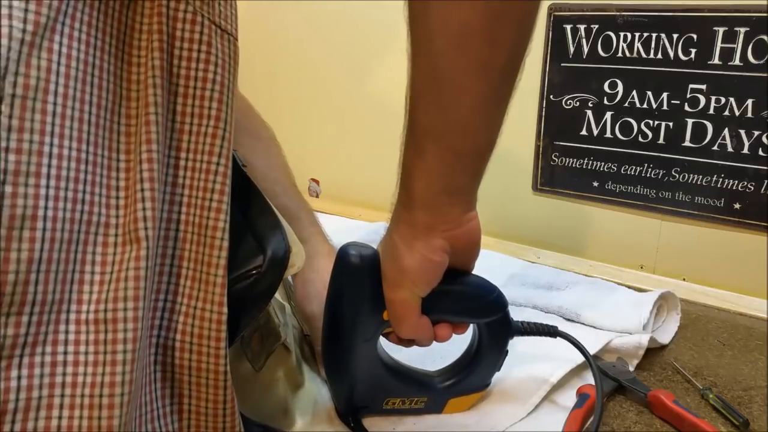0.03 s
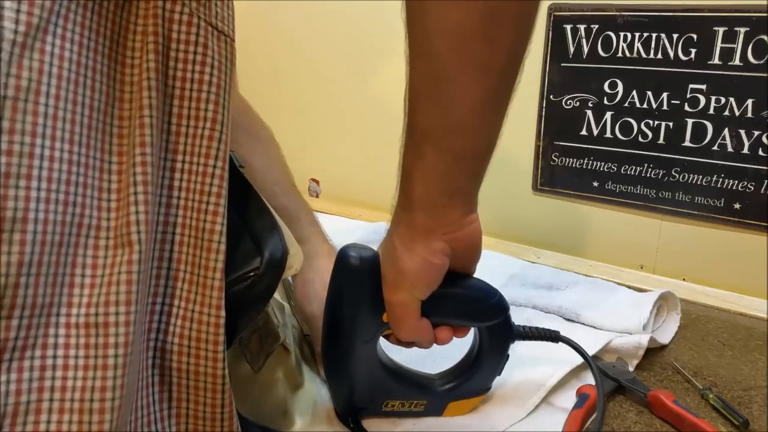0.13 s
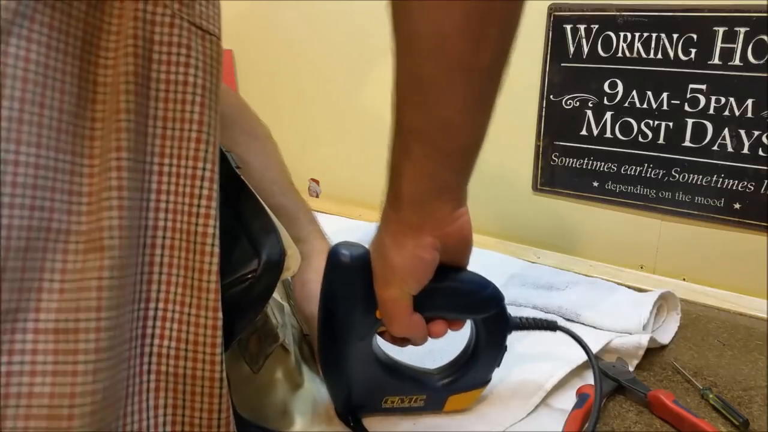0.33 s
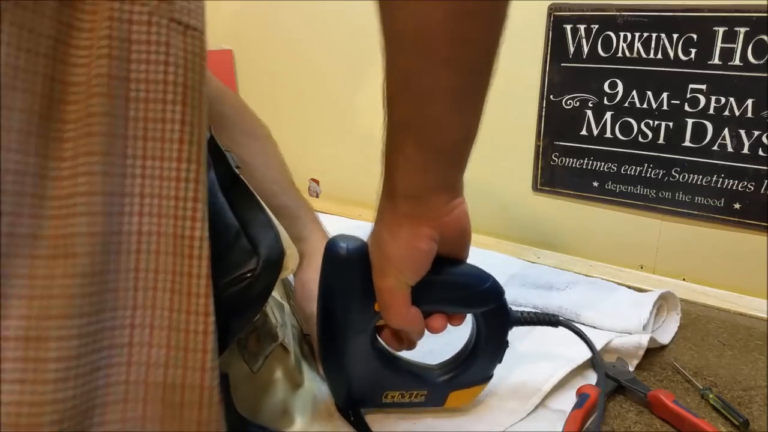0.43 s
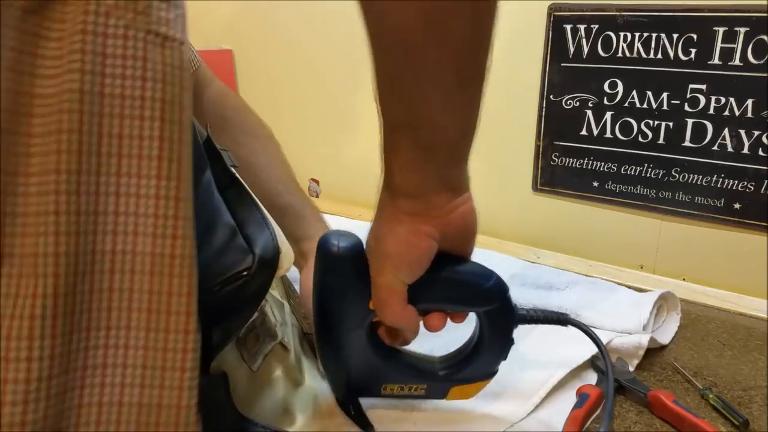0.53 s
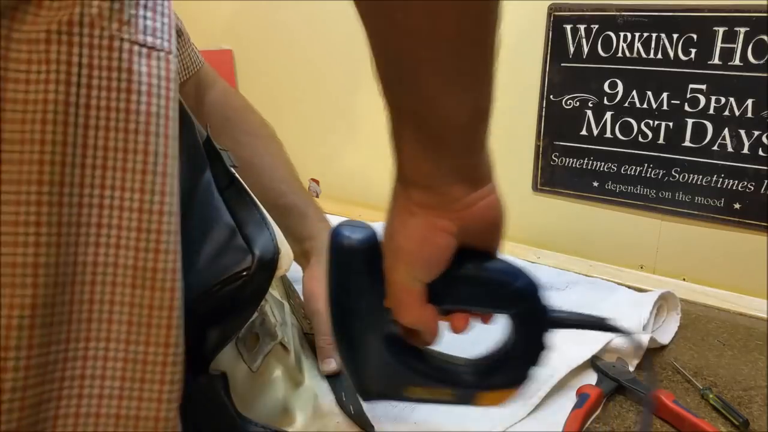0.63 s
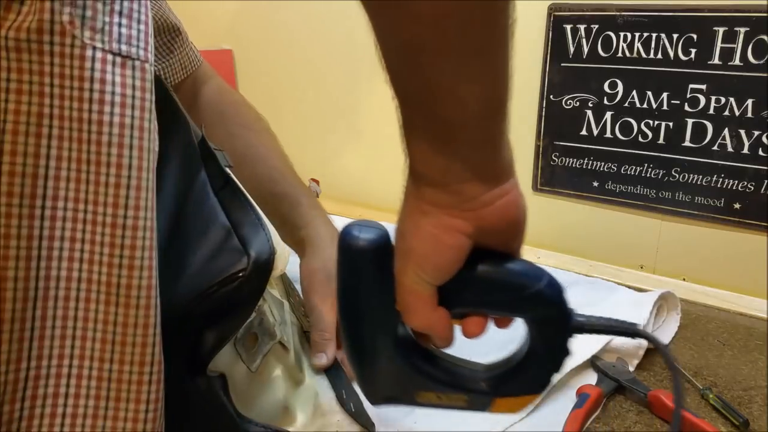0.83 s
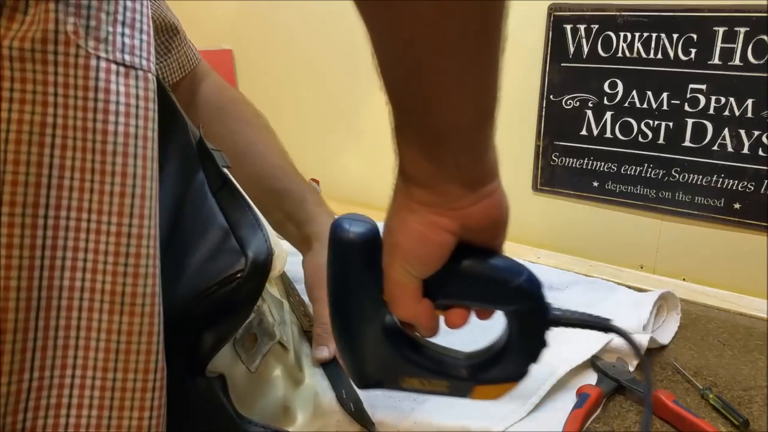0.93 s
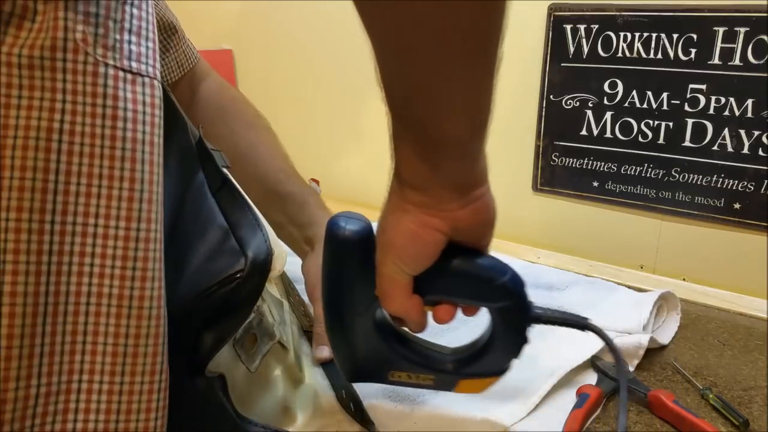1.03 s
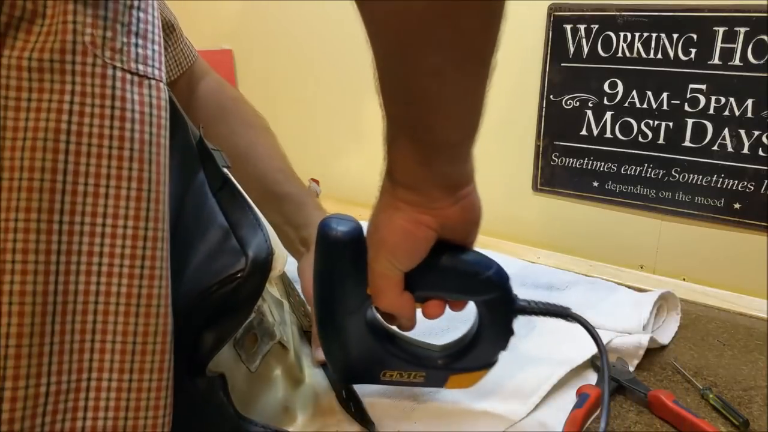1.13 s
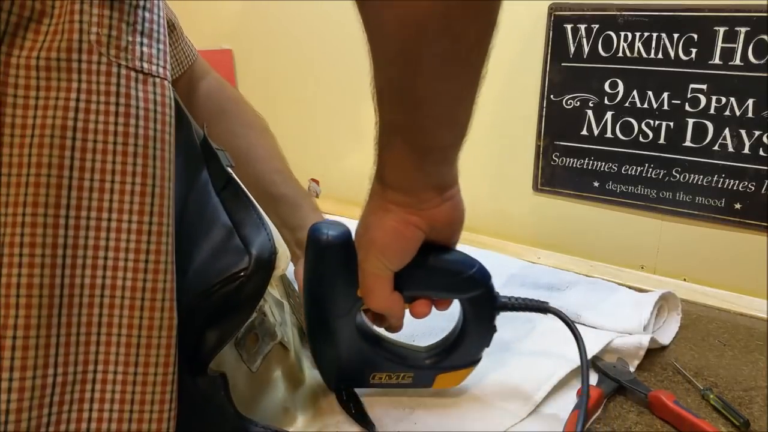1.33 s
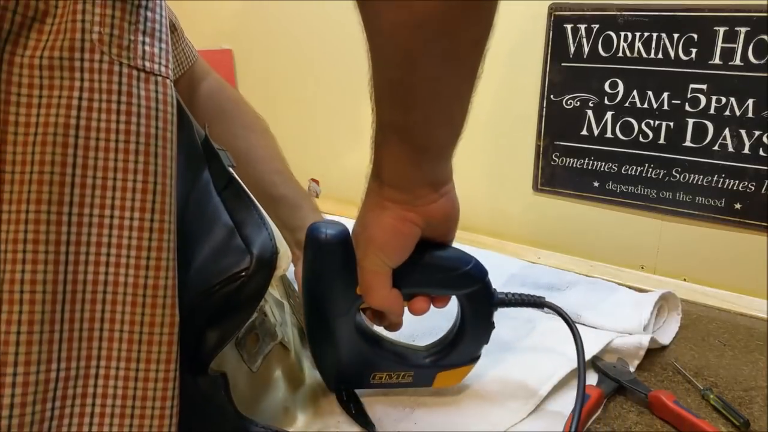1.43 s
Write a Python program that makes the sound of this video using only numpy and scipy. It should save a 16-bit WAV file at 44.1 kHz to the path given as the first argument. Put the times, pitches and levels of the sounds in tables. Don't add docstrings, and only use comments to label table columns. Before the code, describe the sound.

One close staple gun snap, slightly overloaded, with a short bright room tail. Around it a high cricket trill, soft finger ticks, sleeve rustle and faint air; the stereo microphones' automatic gain drops at the shot.

```python
import sys
import numpy as np
from scipy import signal
from scipy.fft import rfft, irfft
from scipy.io import wavfile
from scipy.ndimage import uniform_filter1d

SR = 44100
rng = np.random.default_rng(int(sys.argv[2]) if len(sys.argv) > 2 else 0)


def natural_amplitude(level_db):
    exponent = np.asarray(level_db, float) / 20
    return 10 ** exponent


def materialize(psi):
    bounded = np.clip(np.atleast_2d(psi).T, -1, 1)
    quanta = np.round(bounded * 32767).astype(np.int16)
    wavfile.write(sys.argv[1], SR, quanta)


N = 66150
T = np.arange(N) / SR

# start in seconds, pitch in Hz, level in dB.
CRICKET_DRIFT = [
    (0, 3770, 0),
    (.65, 3775, -1),
    (.8, 3728, -2.5),
    (1.2, 3722, -4.5),
    (1.38, 3790, -1),
    (1.5, 3790, -1),
]
# start in seconds, level in dB.
LOOSE_STROKES = [
    (1.185, -2),
    (1.388, 1),
    (1.448, 2),
    (1.489, -4),
]
WING_OVERTONES = [-35, -36, -36]
# frequency in Hz, 60 dB decay time in seconds.
ROOM_DECAY = [(60, 0.48), (180, .5), (350, 0.66), (700, 0.299), (2000, 0.29), (6000, 0.2), (14000, 0.2134)]
# frequency in Hz, level in dB.
ROOM_COLOUR = [(60, -7), (150, -6.5), (200, -7.5), (350, -3), (1000, 1), (2200, 6.5), (5500, 7.5),
               (7000, 3.5), (15000, 1.5)]
# frequency in Hz, level in dB.
AIR_COLOUR = [(30, -1), (100, -2), (450, -10), (800, -21), (2000, -23.5), (5000, -21.5), (12000, -24),
              (16000, -30)]
# time in seconds, level in dB.
RUMBLE_LEVEL = [
    (0, -65.5),
    (.2, -61),
    (.6, -52.5),
    (1.0, -62),
    (1.15, -57.5),
    (1.35, -58.5),
    (1.5, -57),
]
# start in seconds, level in dB, pitch in Hz, ring in seconds.
TICKS = [(0.028, -43, 5560, 0.0073), (0.0547, -54, 1800, 0.04), (0.144, -43.5, 2193, 0.011),
         (.503, -37, 2872, 0.01323), (.56, -48, 1980, 0.016), (0.621, -47, 3000, .01),
         (0.721, -52, 890, 0.0142), (.838, -58.5, 1508, .015), (0.896, -45, 1516, 0.0183),
         (0.93, -50.5, 1280, 0.019), (1.175, -60.5, 1190, 0.0208)]
# start in seconds, level in dB, pitch in Hz, ring in seconds.
BENCH_BUMPS = [
    (1.203, -42, 75, .04),
    (.965, -52, 80, .05),
]
# start in seconds, length in seconds, level in dB, centre in Hz.
SLEEVE_RUBS = [
    (0.78, 0.36, -68, 796),
    (0.414, 0.27, -67.5, 1550),
    (.68, 0.22, -66, 450),
    (0.7625, 0.44, -65.5, 456),
]
# start in seconds, level in dB, ring-out in seconds, dullness 0-1, left-right pan in dB.
DRIVER_BLOWS = [
    (.2098, -21, .06, .7, 1),
    (.2134, 0, .03, .5, .5),
    (.2160, -1, .035, .6, 1),
    (.2232, -3, .04, .9, 2),
    (.2272, -6, .03, .9, 1),
]
# frequency in Hz, level in dB, 60 dB decay time in seconds (gun()
BODY_MODES = [(414, -4, 0.4), (533, -7.5, 5.0), (794.5, 3.5, 0.17), (1342, -5, 0.26), (1420, -3, 0.1),
              (1989, -13, 0.11), (2263, -2, 0.093), (2840, -15, 0.18), (3070, -29, 5.0)]
# frequency in Hz, density in dB per Hz.
CRACK_COLOUR = [(24, -37), (40, -4), (455, -5.5), (1240, -3.5), (2770, -8.5), (5310, -8), (7540, -15),
                (12500, -15.5), (16000, -24)]
# frequency in Hz, level in dB, 60 dB decay time in seconds.
HOLLOW_MODES = [(148, -30, .35), (255, -30, .2), (330, -36, .5), (762, -20, .09), (430, -24, .08)]
# time in seconds, gain in dB.
CAMERA_GAIN = [
    (0, 0),
    (.188, 0),
    (.206, -11),
    (.228, -12),
    (.232, -17),
    (.29, -13),
    (.7, -13),
    (1.0, -14),
    (1.5, -14),
]

SHOT_S, GUN_DB = .2134, 8.5
STROKE_FIRST_S, STROKE_EVERY_S, STROKE_S = -.0196, .03765, .035
CRICKET_DB, CRICKET_ROOM_DB = -34.5, -6.5


def curve(table, col=1):
    return np.interp(T, [row[0] for row in table], [row[col] for row in table])


def over_hz(table, hz):
    return np.interp(np.log(hz), np.log([row[0] for row in table]), [row[1] for row in table])


def unit(x):
    return x / np.sqrt(np.mean(x ** 2))


def band(x, hz, width):
    return signal.lfilter(*signal.iirpeak(min(hz, SR / 2.2), hz / width, fs=SR), x)


def butter(x, order, hz, kind):
    return signal.lfilter(*signal.butter(order, hz, kind, fs=SR), x)


def tint(x, table):
    hz = np.maximum(np.arange(N // 2 + 1) * SR / N, 1)
    return unit(irfft(rfft(x) * natural_amplitude(over_hz(table, hz)), N))


def fade(start, t60, rise=.0004):
    age = np.maximum(T - start, 0)
    return (1 - np.exp(-age / rise)) * natural_amplitude(-60 * age / t60)


def pair(alike_hz):
    mid, side = rng.standard_normal((2, N))
    side = butter(side, 1, alike_hz, "high")
    return np.array([mid + side, mid - side])


def walk(rate):
    k = int(SR / rate)
    return unit(uniform_filter1d(uniform_filter1d(rng.standard_normal(N), k), k))


def cricket():
    rise_share, sag_hz, sag_shape = .48, 480, 3.6
    spread_hz, file_rough_hz = 8, 13
    even = STROKE_FIRST_S + STROKE_EVERY_S * np.arange(32)
    starts = np.r_[even, [row[0] for row in LOOSE_STROKES]]
    db = np.r_[0 * even, [row[1] for row in LOOSE_STROKES]]
    db = db + 0.71 * rng.standard_normal(len(starts))
    detune = spread_hz * rng.standard_normal(len(starts))

    stroke = np.searchsorted(starts, T) - 1
    done = np.clip((T - starts[stroke]) / STROKE_S, 0, 1)
    swell = np.sin(np.pi * done ** (np.log(.5) / np.log(rise_share))) ** 0.95
    level = natural_amplitude(db[stroke] + CRICKET_DB + curve(CRICKET_DRIFT, col=2))
    hz = curve(CRICKET_DRIFT) + detune[stroke] + file_rough_hz * walk(400) - sag_hz * done ** sag_shape
    phase = 2 * np.pi * np.cumsum(hz) / SR
    tone = np.sin(phase)
    for harmonic, overtone_db in enumerate(WING_OVERTONES, 2):
        tone = tone + natural_amplitude(overtone_db) * np.sin(harmonic * phase)
    return swell * level * tone


def room(x, before):
    noise = rfft(pair(198))
    octave = np.log2(np.arange(N // 2 + 1) * SR / N + 1)
    echo = 0
    for hz in 40 * 2 ** np.arange(0, 9, .5):
        part = irfft(noise * np.clip(1 - 2 * np.abs(octave - np.log2(hz)), 0, 1), N)
        decay = fade(0.0013, over_hz(ROOM_DECAY, hz), rise=0.024)
        echo = echo + natural_amplitude(over_hz(ROOM_COLOUR, hz)) * part * decay
    echo = echo / np.sqrt(np.sum(echo ** 2) / 2)
    tail = signal.fftconvolve(np.r_[before, x][None], echo, axes=1)
    return tail[:, len(before):len(before) + N]


def air():
    rumble = unit(band(pair(150), 70.56, 90.)) * natural_amplitude(curve(RUMBLE_LEVEL) + 2 * walk(30))
    return natural_amplitude(-65.5 + 1.0 * walk(10)) * tint(pair(300), AIR_COLOUR) + rumble


def hands():
    noise = pair(1400)
    out = 0
    for start, db, hz, ring in TICKS:
        tick = band(band(noise, hz, hz * 0.97), hz, hz * 0.97)
        out = out + natural_amplitude(db) * unit(tick) * fade(start, ring, rise=.001)
    for start, db, hz, ring in BENCH_BUMPS:
        bump = np.sin(2 * np.pi * hz * (T - start))
        out = out + natural_amplitude(db) * bump * fade(start, 3 * ring, rise=ring / 8)
    for start, length, db, hz in SLEEVE_RUBS:
        stroke = np.sin(np.pi * np.clip((T - start) / length, 0, 1))
        out = out + natural_amplitude(db + 2 * walk(80)) * unit(band(noise, hz, hz * 0.2)) * stroke
    return out


def gun():
    body_db, thump_db, thump_hz = -9.5, -11.5, 82
    bright = tint(pair(600), CRACK_COLOUR)
    dull = unit(butter(bright, 1, [300, 1800], "band"))
    snap = unit(butter(pair(15000), 2, 8000, "high"))
    out = natural_amplitude(1.5) * snap * fade(SHOT_S, 0.035, rise=0.00026)
    for hz, db, t60 in HOLLOW_MODES:
        tone = np.sin(2 * np.pi * hz * T + rng.uniform(0, 1.1, (2, 1)))
        out = out + natural_amplitude(GUN_DB + db) * tone * fade(SHOT_S, t60, rise=0.0053)

    for start, blow_db, t60, softness, pan_db in DRIVER_BLOWS:
        age = np.maximum(T - start, 0)
        ring = 0
        for hz, db, mode_t60 in BODY_MODES:
            detune = 1 + 0.0039 * rng.standard_normal((2, 1))
            ring = ring + natural_amplitude(db) * np.sin(2 * np.pi * hz * age * detune) * fade(start, min(mode_t60, .06))
        push = np.sin(2 * np.pi * thump_hz * age) * fade(start, .05)
        hit = (1 - softness) * bright * fade(start, 0.67 * t60, rise=0.0006)
        hit = hit + softness * dull * fade(start, t60)
        hit = hit + natural_amplitude(body_db) * ring / 2 + natural_amplitude(thump_db) * push
        out = out + natural_amplitude(GUN_DB + blow_db + np.array([[pan_db], [-pan_db]]) / 2) * hit
    return out


def scene():
    shot, trill, small = gun(), cricket(), hands()

    def late(seconds):
        return np.interp(T - seconds, T, trill)

    left = late(.0001) + natural_amplitude(-11) * late(.0135)
    right = trill + natural_amplitude(-9) * late(.0185)

    soft = trill * np.clip(T / .008, 0, 1)
    earlier = soft * (T < 5 * STROKE_EVERY_S + STROKE_FIRST_S)
    earlier = earlier[:int(5 * STROKE_EVERY_S * SR)]

    click = 1. * (np.arange(N) == int(SHOT_S * SR + 40))
    pulse = tint(click, CRACK_COLOUR) * (T > SHOT_S)
    wet = natural_amplitude(-6) * pulse / 10 + natural_amplitude(-17.5) * shot.mean(0)
    wet = wet + natural_amplitude(CRICKET_ROOM_DB) * soft + natural_amplitude(-7) * small.mean(0)
    return shot + np.array([left, right]) + small + room(wet, natural_amplitude(CRICKET_ROOM_DB) * earlier) + air()


def top_cut(x):
    return signal.sosfilt(signal.butter(12, 16590, fs=SR, output="sos"), x)


def record(dry):
    mics = np.array([butter(dry[0], 1, 70, "high"), butter(dry[1], 1, 20, "high")])
    limited = np.tanh(1.662 * mics * natural_amplitude(curve(CAMERA_GAIN))) / 1.335
    treble_limit = signal.ellip(8, .2, 70, 16500, fs=SR, output="sos")
    return top_cut(signal.sosfilt(treble_limit, limited))


dry = scene()
out = record(dry)
materialize(out)
```